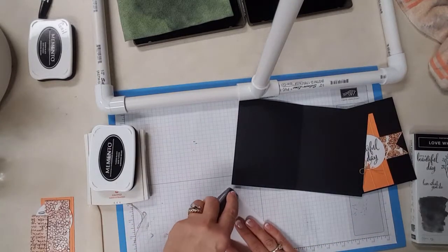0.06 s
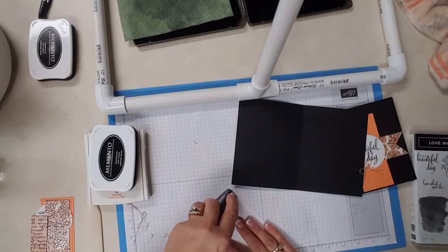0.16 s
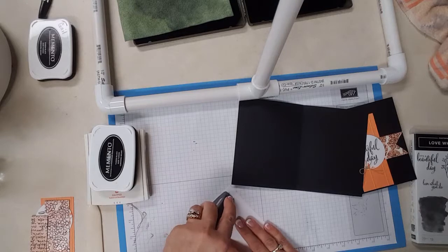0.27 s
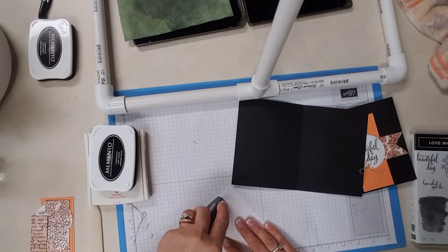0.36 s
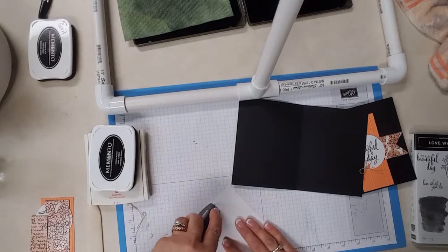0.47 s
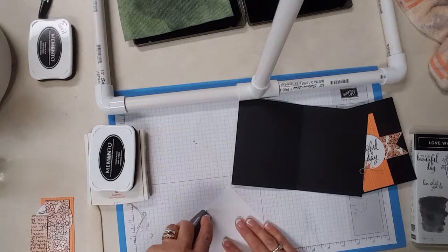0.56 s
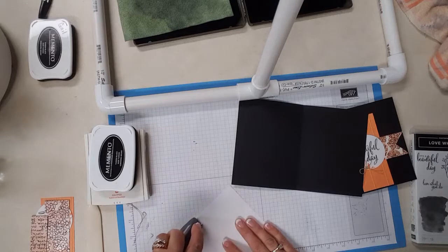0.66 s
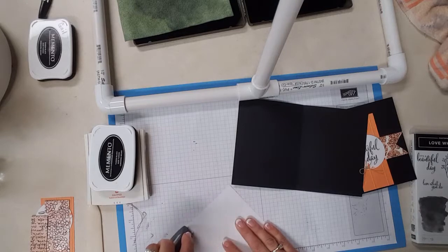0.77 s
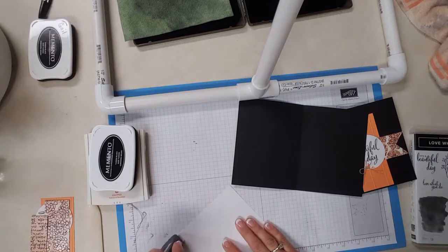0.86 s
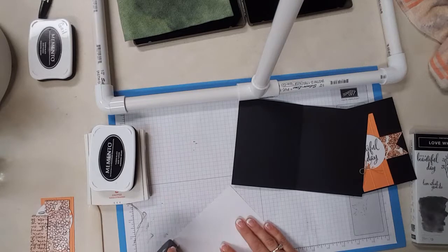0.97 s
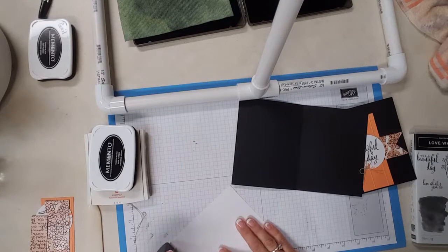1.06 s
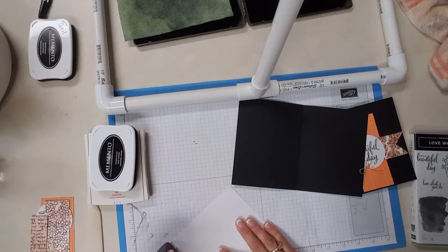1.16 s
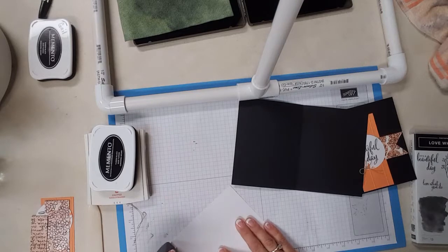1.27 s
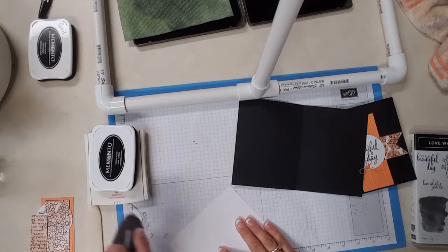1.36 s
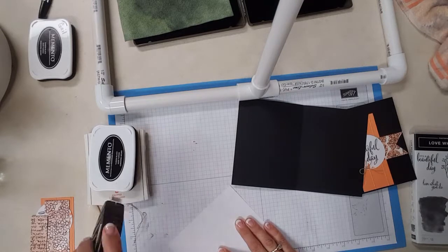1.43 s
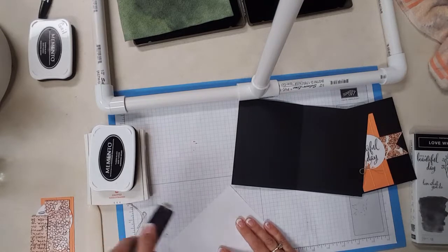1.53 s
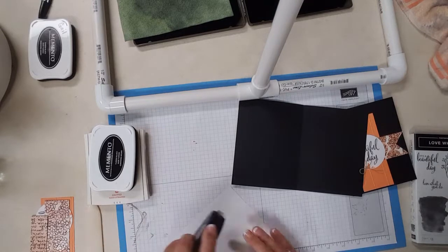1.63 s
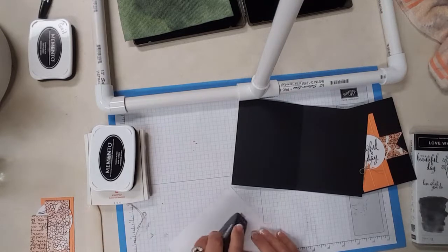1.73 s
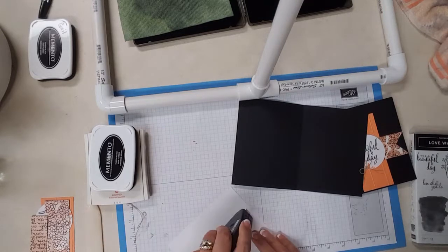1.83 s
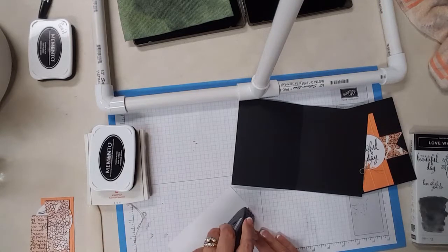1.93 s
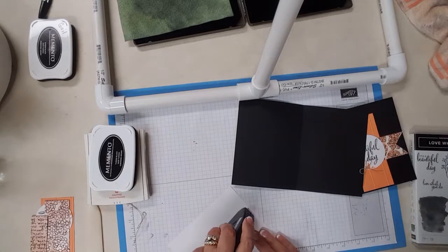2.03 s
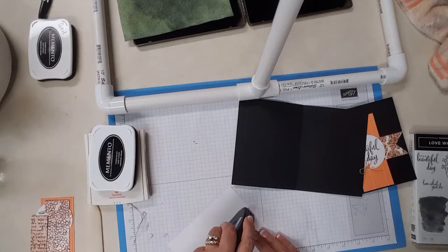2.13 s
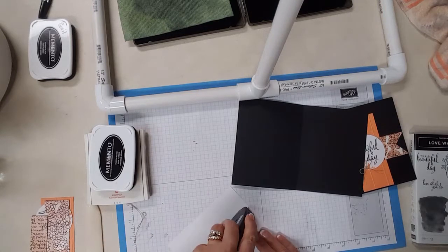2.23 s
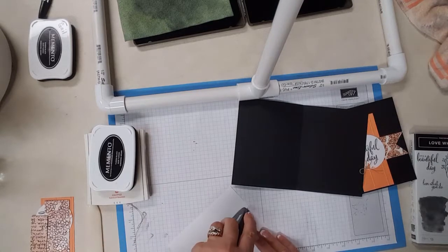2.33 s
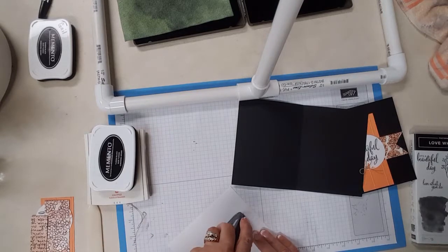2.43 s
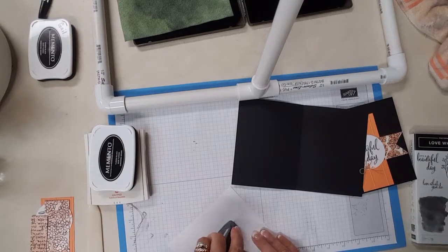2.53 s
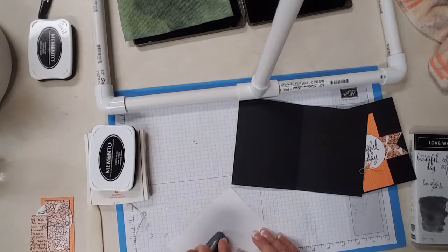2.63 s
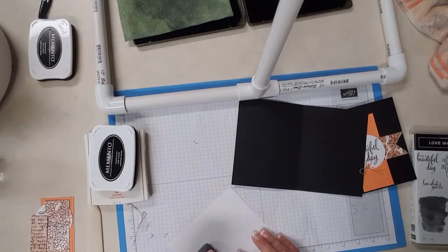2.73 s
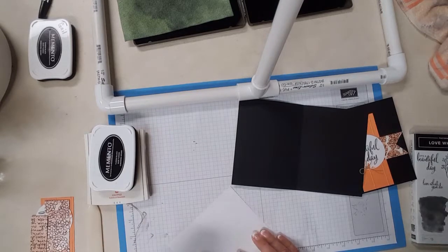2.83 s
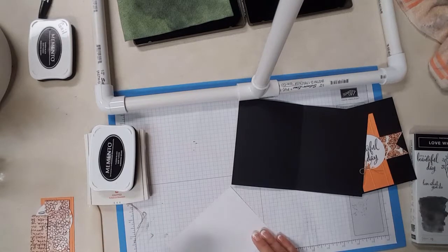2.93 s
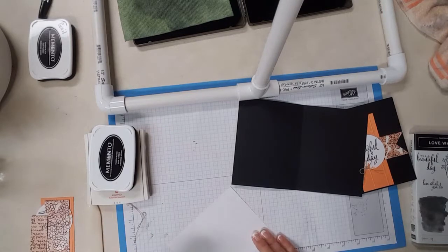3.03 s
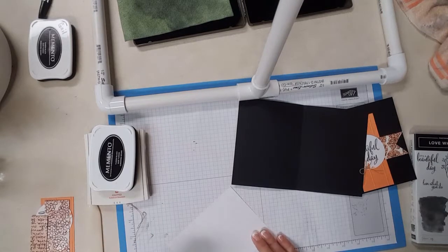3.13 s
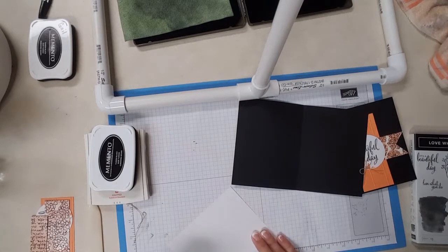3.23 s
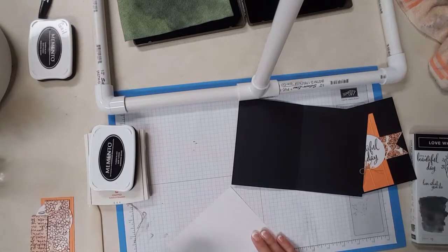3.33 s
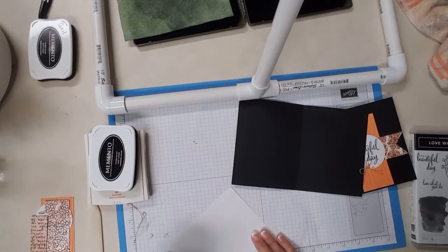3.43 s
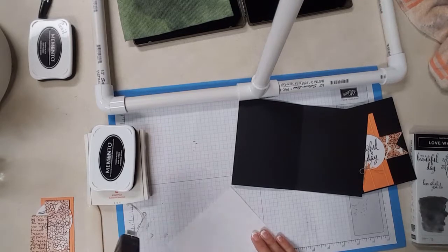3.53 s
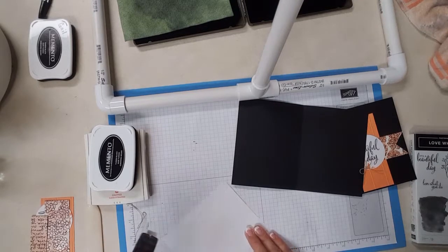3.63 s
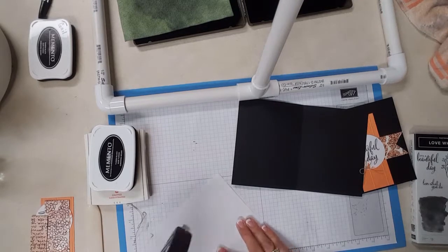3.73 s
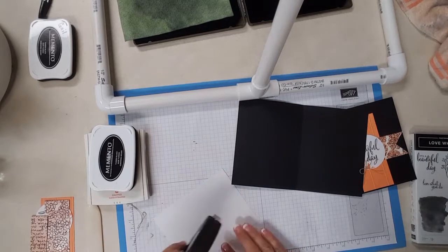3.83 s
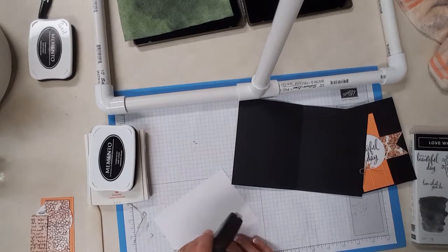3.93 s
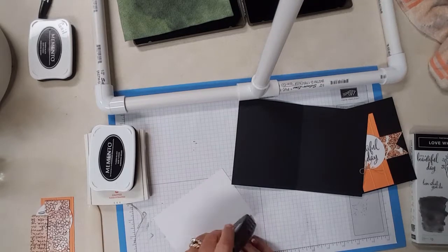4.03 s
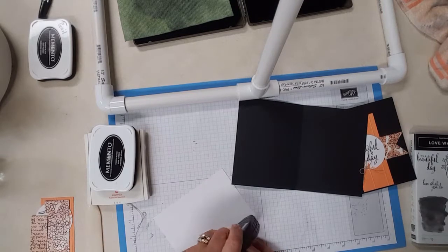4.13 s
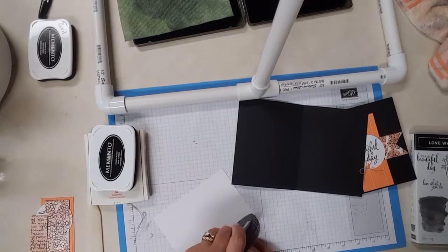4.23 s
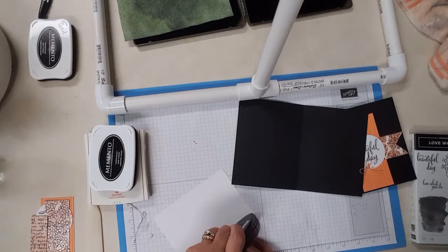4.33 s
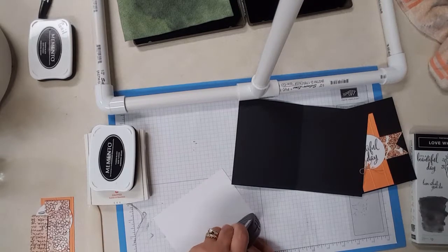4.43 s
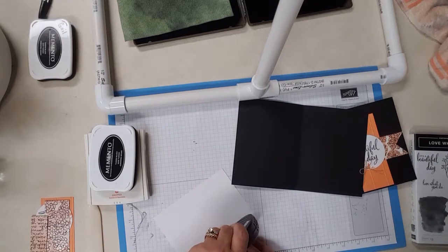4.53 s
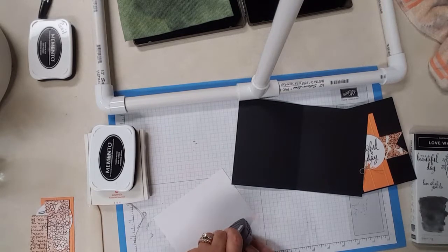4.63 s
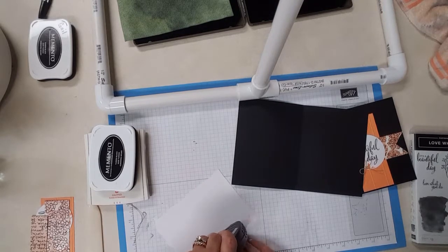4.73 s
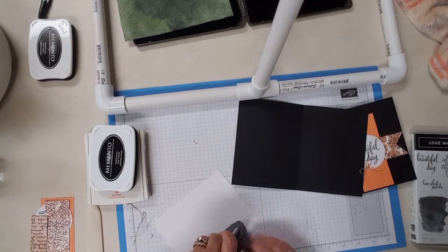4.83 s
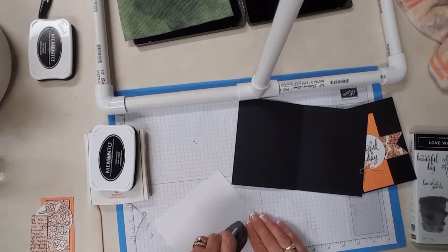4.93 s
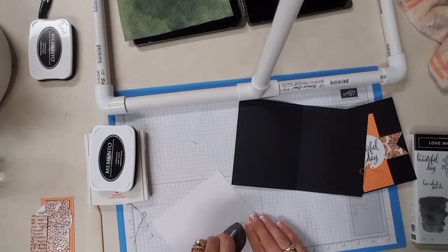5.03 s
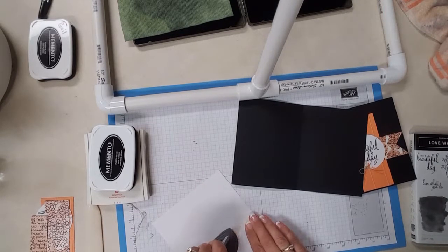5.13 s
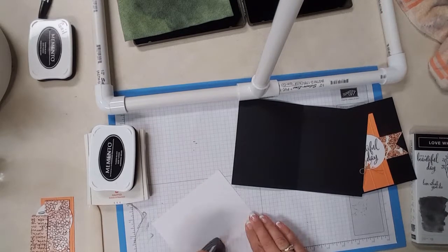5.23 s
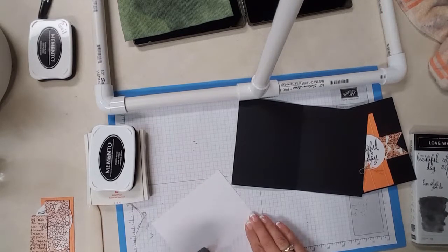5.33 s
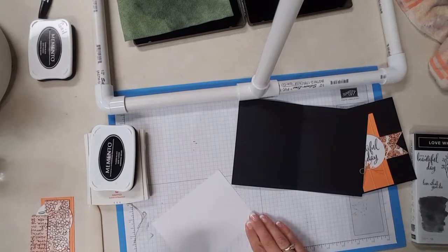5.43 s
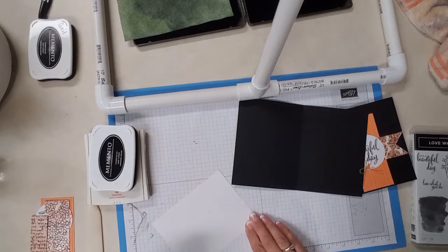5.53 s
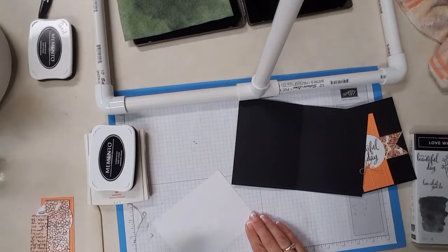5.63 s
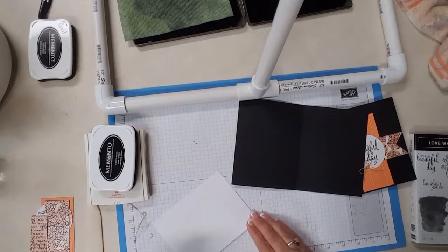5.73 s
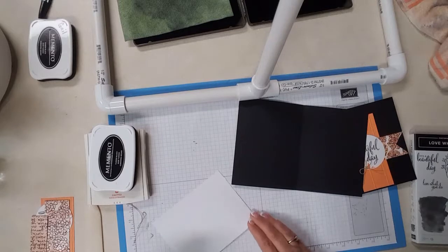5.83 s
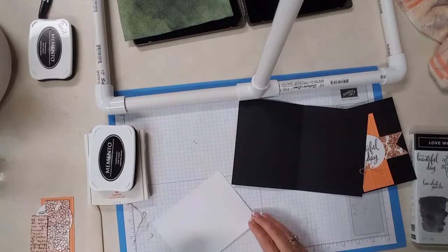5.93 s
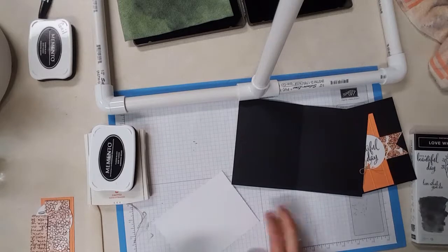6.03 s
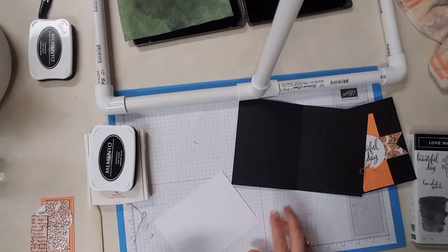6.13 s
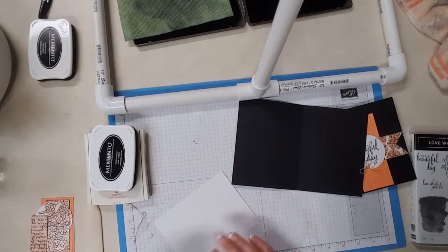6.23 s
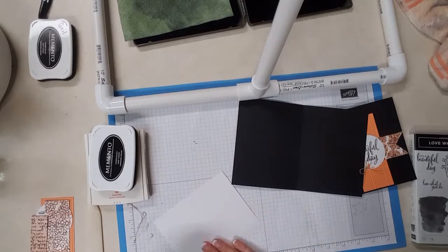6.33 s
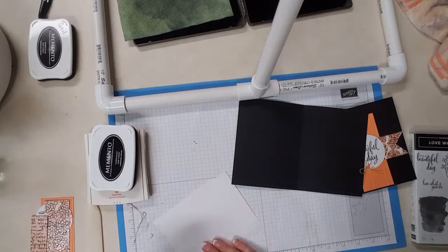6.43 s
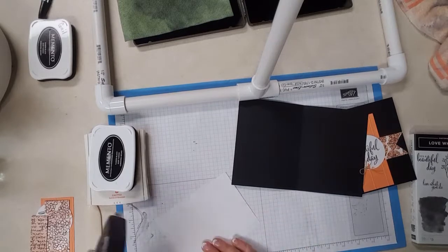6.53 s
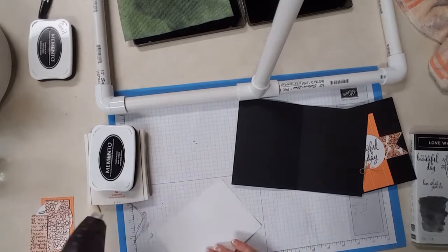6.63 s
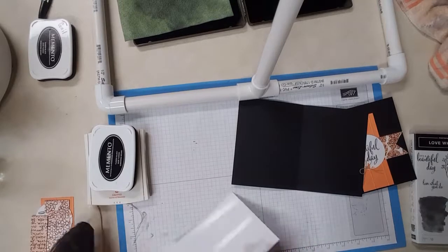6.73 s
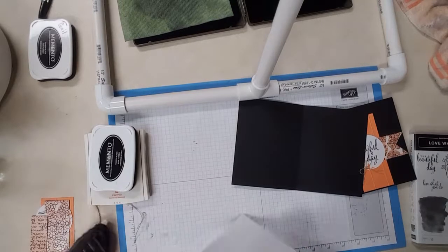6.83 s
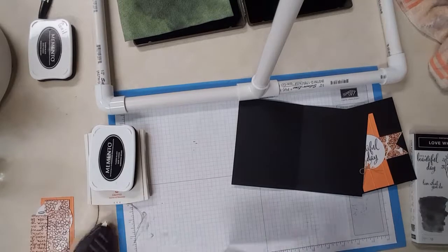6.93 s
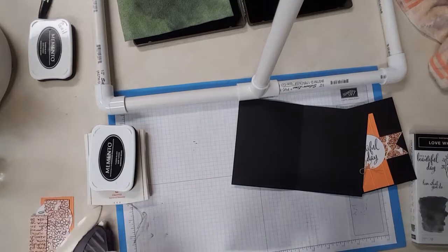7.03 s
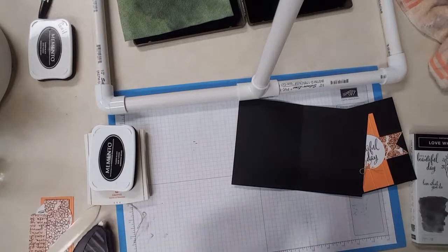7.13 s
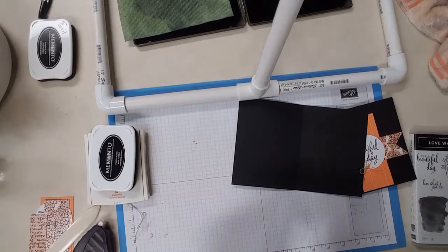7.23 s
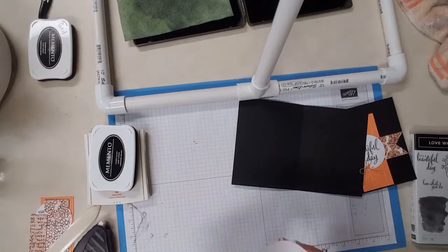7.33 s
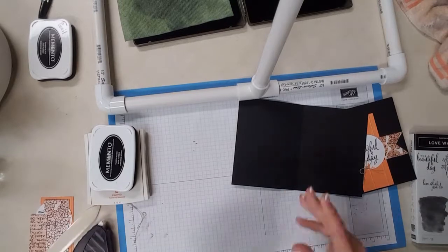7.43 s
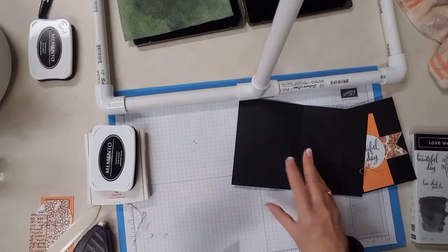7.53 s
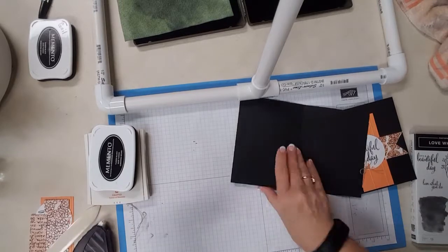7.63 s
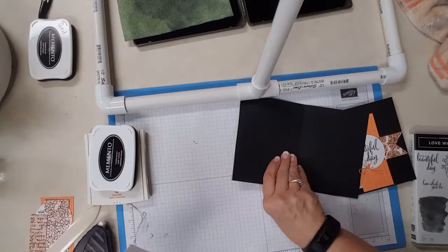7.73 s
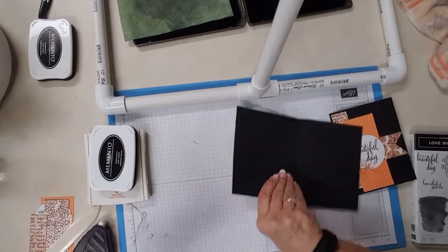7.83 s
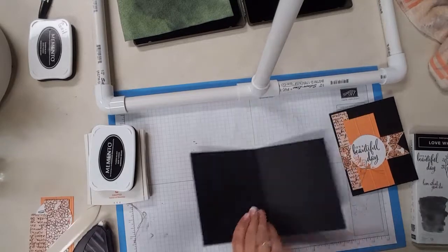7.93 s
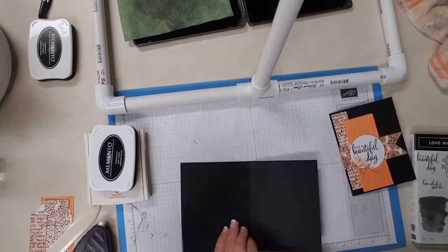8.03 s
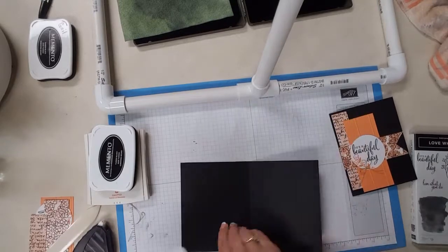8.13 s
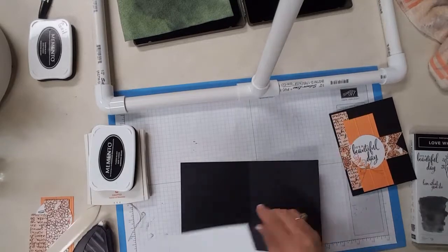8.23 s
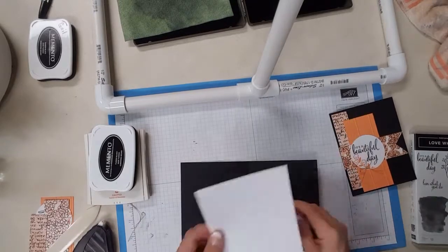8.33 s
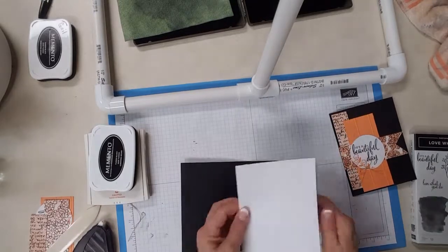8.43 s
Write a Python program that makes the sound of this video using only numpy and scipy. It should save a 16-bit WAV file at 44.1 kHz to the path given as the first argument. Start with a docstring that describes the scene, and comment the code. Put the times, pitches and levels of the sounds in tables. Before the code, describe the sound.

Close to a craft table in a quiet room, a hollow plastic tape runner taps a sheet and rasps along it in four short strokes, its ratchet clicking quickly under a papery hiss. Small snaps follow as it lifts off. The sheet flicks and rustles, the runner is dropped with a bouncing clatter, and stiff cards scrape and slap down.

```python
"""A plastic tape runner is drawn over paper on a craft table in a quiet room, in four strokes.
Taps come first and between; in each stroke a ratchet clicks in the hollow case while the tape peels with a hiss.
After strokes the runner snaps off the sheet; then it is dropped aside with a clatter and cards are slid about.
Blows are clicks and dying noise through resonances, slides are dense grains, thumps are short sine swings.
Steady coloured noise is the air of the room, and dense dying noise its echoes."""
import sys
import numpy as np
from scipy import signal
from scipy.fft import rfft, irfft
from scipy.io import wavfile
from scipy.ndimage import uniform_filter1d

SR = 44100
rng = np.random.default_rng(int(sys.argv[2]) if len(sys.argv) > 2 else 0)


def makeup_ratio(level_db):
    """Linear amplitude ratio for a level in decibels (20 dB per factor of ten)."""
    decades = np.asarray(level_db, float) / 20
    return 10 ** decades


def output_pcm(signal):
    """Save a mono or channel-first signal as 16-bit PCM at the path in sys.argv[1].

    Samples are clipped to [-1, 1] before scaling.
    """
    pcm = np.clip(np.atleast_2d(signal).T, -1, 1) * 32767
    wavfile.write(sys.argv[1], SR, np.round(pcm).astype(np.int16))


N = 374409

# the hand presses and lets go: [start t/s, end t/s, relative hollow ring level/dB, relative pawl rasp level/dB]
STROKES = [(0.376, 1.22, -59, -58.5), (2.377, 3.085, -59, -57.5), (4.574, 4.873, -64, -62),
           (5.093, 5.632, -55.5, -54.5)]
# resonances of the hollow case: [f/Hz, width f/Hz, level/dB]
CASE = [(628, 77, 4), (940, 575, -3), (1156, 720, -3), (1904, 117, -1), (2140, 190, -1.5), (2546, 130, -3),
        (3200, 430, -15.5), (9800, 380, -47)]
# struck spot of the case: [f/Hz of an even blow, octaves per dB of highs, octaves per dB of lows]
CASE_SPOT = (2080, 0.00062, -0.014)
# spectrum of peeling tape and rubbed paper: [f/Hz, relative level/dB per Hz]
HISS = [(1180, -10), (2000, -6.5), (5690, -8), (8510, -4), (10000, -15.5), (11800, -11), (14300, -12.5),
        (15000, -40)]


def rms_one(x):
    """Scales a sound to rms 1."""
    return x / np.sqrt(np.mean(x ** 2) + 1e-20)


def at_hz(points, hz):
    """Reads a curve between its points, along log frequency."""
    return np.interp(np.log(hz), np.log(np.array(points)[:, 0]), np.array(points)[:, 1])


def band(x, low_hz, high_hz):
    """Band-pass with gentle edges."""
    return signal.sosfilt(signal.butter(2, [low_hz, high_hz], "band", fs=SR, output="sos"), x)


def steep(x, low_hz, high_hz):
    """Band-pass with steeper edges."""
    return signal.sosfilt(signal.butter(4, [low_hz, high_hz], "band", fs=SR, output="sos"), x)


def resonance(x, hz, width_hz):
    """One ringing mode; the narrower, the longer it rings."""
    r = np.exp(-np.pi * width_hz / SR)
    feed = [(1 - r * r) / 2, 0, (r * r - 1) / 2]
    ringing = [1, -2 * r * np.cos(2 * np.pi * hz / SR), r * r]
    return signal.lfilter(feed, ringing, x + 1e-18)


def body(x, modes, direct_db):
    """Parallel resonances with alternating signs, over a share of unshaped sound."""
    out = makeup_ratio(direct_db) * x
    for k, (hz, width_hz, level_db) in enumerate(modes):
        out = out + (-1) ** k * makeup_ratio(level_db) * resonance(x, hz, width_hz)
    return out


def coloured(spectrum):
    """Stereo noise of the given spectrum and left-right likeness; rms 1."""
    # left-right likeness: [f/Hz, correlation]
    likeness = [(60, 0.85), (240, 0.74), (950, 0.13), (3770, -0.22), (15000, 0.098)]
    hz = np.arange(1, N // 2 + 2) * SR / N
    mid, side = rfft(rng.standard_normal((2, N))) * makeup_ratio(at_hz(spectrum, hz))
    alike = np.clip(at_hz(likeness, hz), -1, 1)
    return rms_one(irfft(np.sqrt(1 + alike) * mid + np.sqrt(1 - alike) * side * [[1], [-1]], N))


def grains(per_s, spread_db):
    """Random clicks of uneven size; rms 1."""
    sizes = makeup_ratio(spread_db * np.minimum(rng.exponential(1, N), 5)) * rng.choice([-1, 1], N)
    return rms_one(sizes * (rng.random(N) < per_s / SR))


def air():
    """The quiet room's steady noise, mostly bass."""
    # spectrum: [f/Hz, relative level/dB per Hz]
    air_spectrum = [(12, 1), (20, -14), (33, -19), (87, -2), (109, -5), (140, -2), (238, -6), (597, -12.5),
                    (788, -16.5), (1300, -15.5), (4190, -24), (14500, -30), (15000, -49)]
    return makeup_ratio(-67) * coloured(air_spectrum) * makeup_ratio([[.8], [-.8]])


def room(x):
    """Dense echoes dying away, the treble faster; mostly alike at both ears in the bass."""
    t60_s, level_db = 0.44, -11.5
    t = np.arange(SR // 2) / SR
    low, middle, high = rng.standard_normal((3, 2, len(t)))
    echoes = band(low[0] + 0.042 * low, 97, 1070) + band(middle, 594, 4070)
    echoes = echoes * makeup_ratio(-60 * t / t60_s)
    echoes = echoes + band(high, 4100, 8200) * makeup_ratio(0.5 - 110 * t / t60_s)
    echoes = echoes * (t > .003)      # a short gap ahead of the first echo
    echoes = echoes / np.sqrt(np.sum(echoes ** 2, axis=1, keepdims=True))
    return makeup_ratio(level_db) * signal.fftconvolve(x, echoes, axes=1)[:, :N]


def thumps():
    """A soft hand sets the table top swinging for a few cycles."""
    # hand on table: [t/s, swing level before decay/dB, f/Hz]
    hand_rows = [(0.844, -44.5, 230), (3.63, -51, 153), (3.699, -55, 145), (4.001, -62, 100),
                 (5.016, -45, 139), (6.388, -50.5, 107), (6.882, -45, 110), (7.04, -26, 224),
                 (7.084, -38, 109), (7.441, -47, 139), (7.657, -46.5, 185)]
    out, t = np.zeros(N), np.arange(SR // 5) / SR
    for s, level_db, hz in hand_rows:
        swing = np.sin(2 * np.pi * hz * t) * np.exp(-t * hz / 1.2)
        out[round(s * SR):][:len(t)] += makeup_ratio(level_db) * swing
    return out


def slide():
    """Rubbing fibres give dense grains around a pitch of the sheet, a bright hiss and a rumble in the table."""
    # paper and skin sliding: [start t/s, end t/s, relative rub level/dB, rub f/Hz, relative hiss level/dB]
    slide_rows = [(0.32, 0.434, -61.5, 2060, -65.5), (3.58, 3.88, -79, 2510, -59.5),
                  (5.77, 5.84, -72.5, 3520, -79), (6.072, 6.21, -82, 2580, -61.5),
                  (6.618, 6.781, -72, 2050, -63.5), (6.745, 6.947, -64, 1910, -63),
                  (7.688, 7.834, -59, 1810, -67), (7.75, 8.034, -53.5, 1890, -61),
                  (8.011, 8.154, -53.5, 2200, -60.5), (8.06, 8.38, -60.5, 1224, -69),
                  (8.339, 8.55, -58.5, 1890, -70.5)]
    rumble_under_rub_db = 4.5
    fibres = np.array([grains(1800, spread_db=2.5) for ear in range(2)])
    hiss = coloured(HISS)
    rumble = rms_one(band(rng.standard_normal(N), 66, 680))
    out = np.zeros((2, N))
    for start_s, end_s, rub_db, rub_hz, hiss_db in slide_rows:
        on = slice(round(start_s * SR), min(round(end_s * SR), N))
        swell = np.abs(np.sin(np.pi * (np.arange(N)[on] / SR - start_s) / (end_s - start_s)))
        width_hz = rub_hz * (rub_hz / 2600) ** 3      # a lower rub is narrower
        rub = rms_one(resonance(fibres[:, on], rub_hz, width_hz))
        mix = makeup_ratio(rub_db) * rub + makeup_ratio(hiss_db) * hiss[:, on]
        out[:, on] += swell * (mix + makeup_ratio(rub_db - rumble_under_rub_db) * rumble[on])
    return out * makeup_ratio([[1.5], [-1.5]])


def blows(rows, modes, direct_db, rattle_db, gain_db, snap_db, pan_db, lag, spot):
    """Each blow is a sharp contact and a dying rattle, weighted low, middle and high, sent through the body."""
    build_s = .0015      # the contact takes this long to build
    push, snaps = np.zeros((3, 2, N)), np.zeros((2, N))      # push: weight band, ear, time
    noise = rng.standard_normal((3, N))
    for s, level_db, low_db, high_db, t60 in rows:
        # the struck spot's pitch leans on how bright and how heavy the blow is
        snap_hz = np.clip(spot[0] * 2 ** (spot[1] * high_db + spot[2] * low_db), 500, 6000)
        i = round(s * SR)
        t = np.arange(min(N - i, SR // 3)) / SR
        weights = makeup_ratio(level_db + gain_db + np.array([low_db, 0, high_db]))
        hold = np.clip(t60, .01, 1) * np.array([[1.2], [1], [.6]])      # the treble dies first
        # the ears differ little in the bass, most in the treble
        own = np.array([.15, .6, 1.1])[:, None, None] * noise[:2, i:i + len(t)]
        rattle = makeup_ratio(rattle_db - 60 * t / hold)
        crunch = makeup_ratio(rattle_db + 11.0 - 60 * t / 0.0068)      # short and loud, ahead of the rattle
        build = np.minimum(t / build_s, 1) ** 2
        shape = ((rattle + crunch) * build)[:, None] * (noise[2, i:i + len(t)] + own)
        shape[:, :, round(build_s * SR)] += [[1], [1], [.4]]      # the sharp contact
        push[:, :, i:i + len(t)] += weights[:, None, None] * shape
        snaps[:, i:i + len(t)] += weights[1] * resonance(shape[1], snap_hz, snap_hz / 3.48)
    push = steep(push[0], 150, 1400) + steep(push[1], 1400, 4300) + steep(push[2], 4300, 15000)
    out = body(push, modes, direct_db) + makeup_ratio(snap_db) * band(snaps, 2100, 5300)
    out[1] = np.roll(out[1], lag)      # samples by which the right ear hears it later
    return out * makeup_ratio([[pan_db / 2], [-pan_db / 2]])


def cards():
    """Cards snap and slap: blows on a broad, bright body."""
    # blows: [t/s, relative level/dB, lows over it/dB, highs over it/dB, nominal rattle t60/s]
    card_rows = [(1.6447, -56, -24, 0, 0.093), (1.7868, -55.5, -30, -3, 0.14), (5.855, -56, 1.5, 1, 0.039),
                 (6.0471, -62, 12, 3, 0.035), (6.0791, -28.5, -12.5, -10, 0.022),
                 (6.0925, -30.5, -16, -1.5, 0.014), (6.3886, -51.5, -25, -3, 0.13),
                 (6.5863, -58.5, -12, 4, 0.057), (7.7087, -40, -24, -16.5, 0.18),
                 (7.8142, -25.5, -12.5, -29, 0.089), (7.8444, -43, 7, -5, 0.083),
                 (8.0652, -32.5, 1, 3, 0.013), (8.0974, -32.5, -1, -21.5, 0.078),
                 (8.2655, -59.5, 23.5, -30, 0.064), (8.3942, -41.5, -0.5, -32, 0.03),
                 (8.4352, -29.5, -4, -13, 0.012), (8.4472, -33.5, -9.5, -18, 0.098),
                 (8.474, -14, 2, -18, 0.023)]
    # resonances: [f/Hz, width f/Hz, level/dB]
    card_modes = [(513, 220, 16.5), (3190, 720, -0.5), (4200, 13000, -9), (8100, 1600, 8.5)]
    # struck spot: [f/Hz of an even blow, octaves per dB of highs, octaves per dB of lows]
    card_spot = (2010, 0.05, -0.023)
    return blows(card_rows, card_modes, direct_db=-9.5, rattle_db=-18.5, gain_db=9.5,
                 snap_db=10.5, pan_db=2.5, lag=0, spot=card_spot)


def clatter():
    """The dropped runner bounces: blows on a tray with many narrow modes."""
    # blows: [t/s, relative level/dB, lows over it/dB, highs over it/dB, nominal rattle t60/s]
    drop_rows = [(6.8773, -12.5, -5.5, -21, 0.1), (6.9107, -20, -8, -21.5, 0.18),
                 (6.9642, -19.5, -3, -29, 0.1), (7.033, -10.5, -7, -9, 0.15),
                 (7.0677, -25.5, 3.5, -3.5, 0.16), (7.1206, -31, -8.5, -7, 0.46),
                 (7.2412, -30, -9, -28, 0.14), (7.2951, -54, 18, -20, 0.11),
                 (7.3592, -27, -10.5, -9.5, 0.03), (7.4177, -21.5, -10, -10.5, 0.061),
                 (7.434, -25, -12, -12.5, 0.085), (7.4809, -47.5, -24, 2.5, 0.038)]
    # resonances: [f/Hz, width f/Hz, level/dB]
    tray_modes = [(230, 96, 7), (442, 108, 11.5), (647, 166, 10.5), (826, 37, 12), (973, 190, 10),
                  (1218, 22, 5.5), (1810, 220, -4), (2200, 47, 10.5), (3240, 310, -17.5), (5600, 970, -11),
                  (7980, 810, 8), (11500, 150, 2.5)]
    # struck spot: [f/Hz of an even blow, octaves per dB of highs, octaves per dB of lows]
    tray_spot = (2360, 0.045, -.001)
    return blows(drop_rows, tray_modes, direct_db=-15, rattle_db=-19.5, gain_db=17.5,
                 snap_db=9, pan_db=3.0, lag=10, spot=tray_spot)


def lifts():
    """The runner is snapped off the sheet and the tape breaks: blows on case and lifted sheet."""
    # blows: [t/s, relative level/dB, lows over it/dB, highs over it/dB, nominal rattle t60/s]
    lift_rows = [(1.3837, -45, -1, 13, 0.3), (1.4057, -35, 14, 17.5, 0.073), (1.4494, -55, 11, 17, 0.099),
                 (3.478, -46.5, 13, 24.5, 0.048), (3.4892, -32.5, 5, 10, 0.078),
                 (3.5194, -42.5, 4, 23, 0.18), (4.9452, -37.5, 4.5, 10, 0.022),
                 (4.9594, -47.5, 12, 21, 0.041), (6.5046, -38, 11, 15, 0.12)]
    # resonances of case and lifted sheet: [f/Hz, width f/Hz, level/dB]
    lifted_modes = [(636, 250, 2.5), (923, 520, 3), (1350, 990, -7.5), (1870, 125, 12), (1960, 220, 7.5),
                    (2650, 590, -7.5), (3370, 300, -32.5)]
    return blows(lift_rows, lifted_modes, direct_db=-22, rattle_db=-19.5, gain_db=16,
                 snap_db=10, pan_db=3.5, lag=1, spot=CASE_SPOT)


def taps():
    """The runner taps the sheet: blows that ring its hollow case."""
    # blows: [t/s, relative level/dB, lows over it/dB, highs over it/dB, nominal rattle t60/s]
    tap_rows = [(0.001, -56.5, 17, -18, 0.25), (0.0398, -35, 11, -28, 0.014), (0.1067, -58, 26, -25, 0.024),
                (0.1474, -64, 22, -31, 0.033), (0.177, -47.5, 6, 9.5, 0.036),
                (0.3155, -48, 15.5, 17, 0.086), (0.393, -47.5, -12, -19, 0.078), (0.848, -35, 7, 14, 0.043),
                (1.2132, -54, 6.5, -25, 0.064), (2.1276, -40, -31, 10, 0.033),
                (2.386, -46.5, -13, 20.5, 0.033), (3.022, -56, 12.5, -25, 0.17),
                (3.1994, -64.5, 16, -9, 0.1), (4.5367, -33.5, -5, 14, 0.035)]
    return blows(tap_rows, CASE, direct_db=-25.5, rattle_db=-18.5, gain_db=17,
                 snap_db=4.5, pan_db=4.0, lag=1, spot=CASE_SPOT)


def press(peak, pointed):
    """One hump in dB a stroke, rows = strokes: silent at both ends, 0 dB at the given share of the way."""
    start_s, end_s = np.array(STROKES)[:, :2].T[:, :, None]
    way = np.clip((np.arange(N) / SR - start_s) / (end_s - start_s), 0, 1)
    hump = np.sin(np.pi * way ** (np.log(.5) / np.log(peak)))
    return 20 * pointed * np.log10(np.abs(hump) + 1e-7)


def ratchet():
    """The pawl clicks over each tooth, bounces once and scuffs; the wheel's speed swells in mid-stroke."""
    # one row a stroke, speed leaning to the first half:
    # [first tooth t/s, last tooth t/s, teeth passed, swell share, lean share]
    wheel_rows = [(.497, 1.114, 29, .116, .031), (2.441, 3.024, 29, .27, .027),
                  (4.61, 4.799, 7, .077, .092), (5.131, 5.584, 24, .313, .074)]
    scuff_s = .0006      # decay time of the scuff
    clicks, way = np.zeros(N), np.linspace(0, 1, 200)
    for first_s, last_s, teeth, swell, lean in wheel_rows:
        uneven = lean * (1 - np.cos(2 * np.pi * way)) - swell * np.sin(2 * np.pi * way)
        turned = way + uneven / (2 * np.pi)
        at = np.interp(np.arange(teeth + 1), teeth * turned, first_s + way * (last_s - first_s))
        luck = rng.standard_normal((len(at), 2))      # teeth differ in timing and level
        clicks[np.round((at + .0004 * luck[:, 0]) * SR).astype(int)] = makeup_ratio(2.2 * luck[:, 1])
    clicks = clicks + 0.34 * np.roll(clicks, int(0.00353 * SR))      # the bounce
    scuff = signal.lfilter([1], [1, -np.exp(-1 / (scuff_s * SR))], clicks) * rng.standard_normal(N)
    clicks = scuff * .2 + .6 * clicks
    # the clicks stand clear early in a stroke, then sink into the grain
    return clicks * makeup_ratio(np.max(press(peak=.33, pointed=1.8), axis=0) - 2)


def runner():
    """Ratchet clicks and the fine grains of peeling tape ring the case; the tape hisses off its liner."""
    catch_db, catch_s = 2.5, .03      # the tape catches and gives: rms depth, smoothing length
    catch = uniform_filter1d(rng.standard_normal((2, N)), round(catch_s * SR))
    catch = catch_db * rms_one(uniform_filter1d(catch, round(catch_s * SR)))
    strokes = np.array(STROKES)
    ring_db = np.max(strokes[:, 2:3] + press(peak=0.46, pointed=0.92), axis=0)
    rasp_db = np.max(strokes[:, 3:4] + press(peak=0.4, pointed=1.53), axis=0)
    moving = ring_db > -140
    clicks = ratchet()
    ring = body(clicks + .02 * grains(600, spread_db=4), CASE, direct_db=-30)
    rasp = body(clicks + .018 * grains(1500, spread_db=4), CASE, direct_db=-30)
    ring, rasp = band(ring, 300, 950), steep(rasp, 900, 4200)
    # each layer is levelled over the strokes alone
    ring = ring / np.sqrt(np.mean(ring[moving] ** 2))
    rasp = rasp / np.sqrt(np.mean(rasp[moving] ** 2))
    case = makeup_ratio(ring_db + catch[0]) * ring + makeup_ratio(rasp_db + catch[1]) * rasp
    peel = makeup_ratio(-29.5 + 0.59 * rasp_db) * moving * coloured(HISS)      # the hiss follows the rasp, flatter
    return case * makeup_ratio([[1.2], [-1.2]]) + peel


def scene():
    """All sources on the table, their echoes and the air of the room."""
    near = runner() + thumps() + slide()
    near = near + taps() + lifts() + clatter() + cards()
    return near + room(near) + air()


def roll_off(x):
    """The treble ends steeply here."""
    return signal.sosfilt(signal.butter(12, 16480, fs=SR, output="sos"), x)


def record(dry):
    """Delivers the finished stereo mix."""
    return roll_off(dry)


dry = scene()
out = record(dry)
output_pcm(out)
```